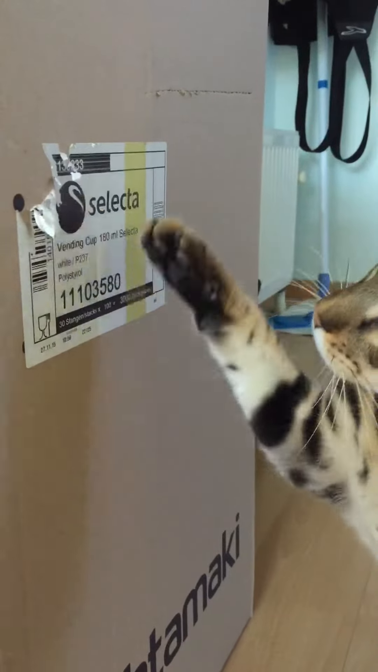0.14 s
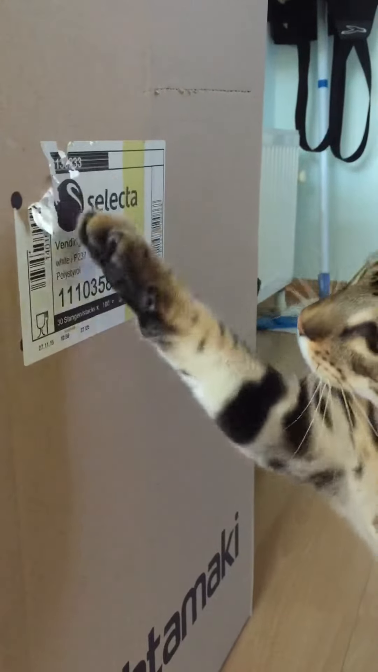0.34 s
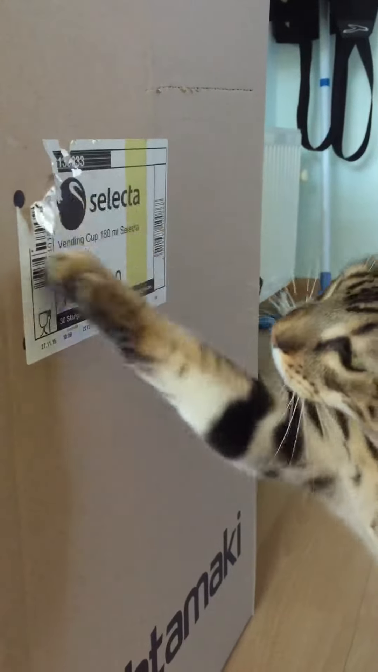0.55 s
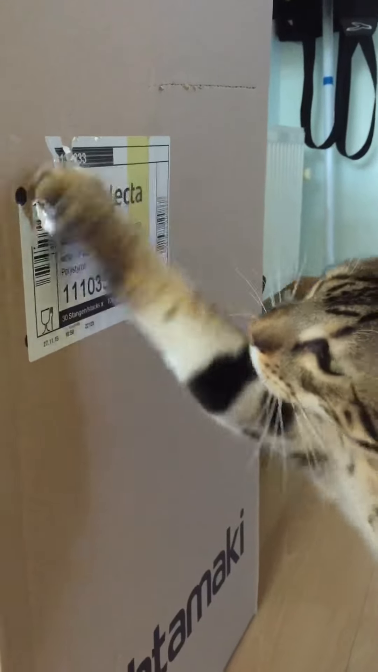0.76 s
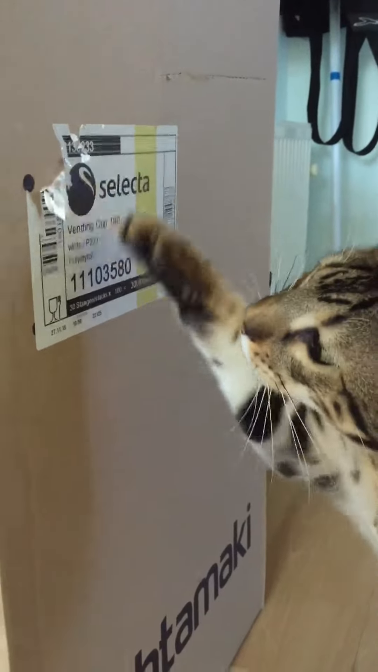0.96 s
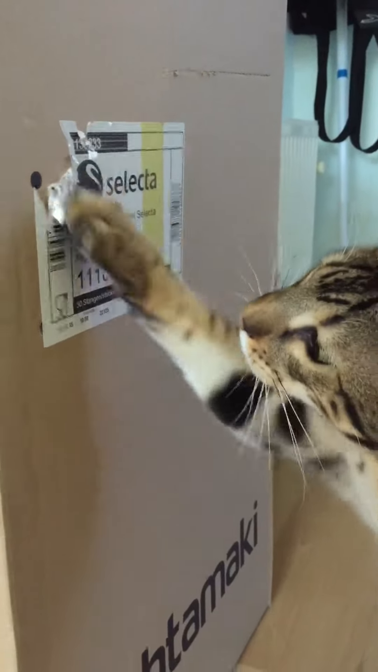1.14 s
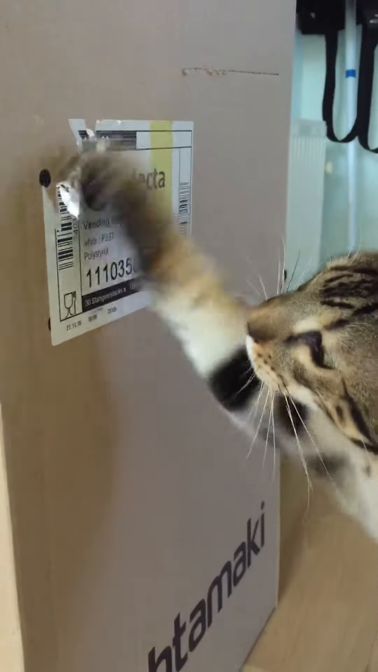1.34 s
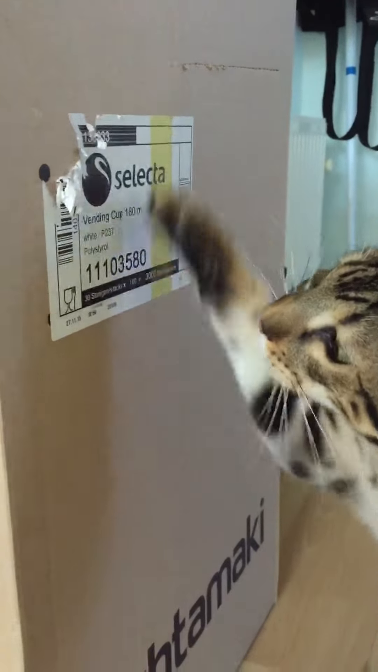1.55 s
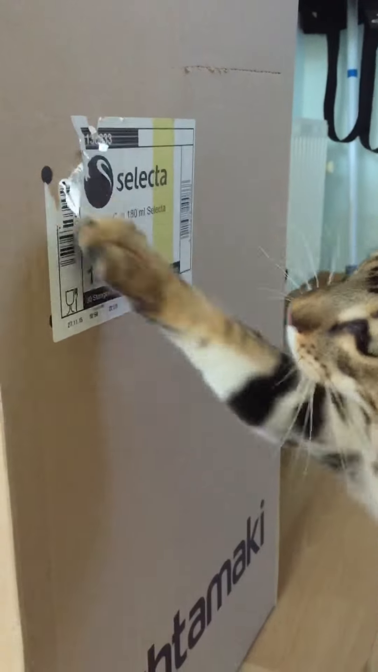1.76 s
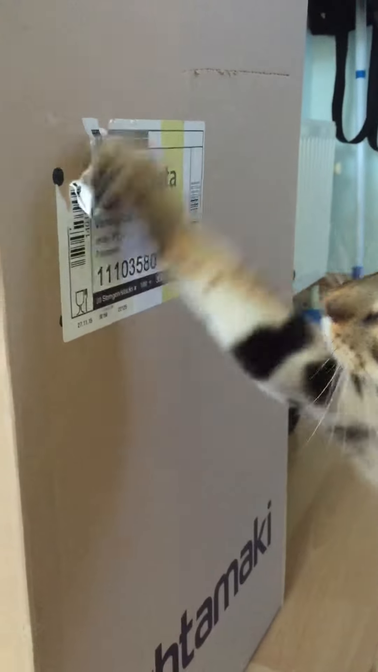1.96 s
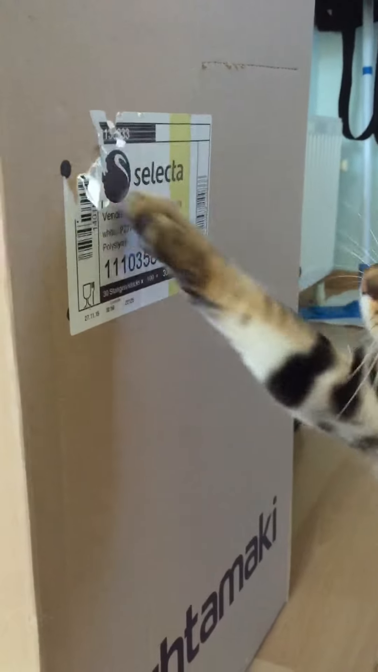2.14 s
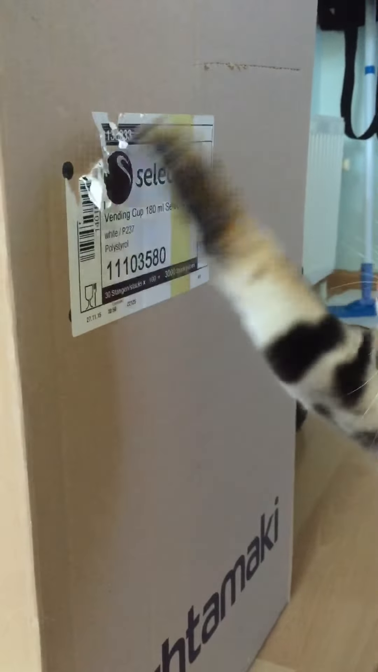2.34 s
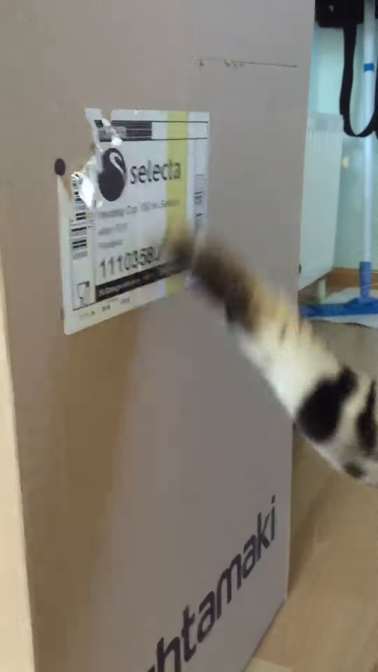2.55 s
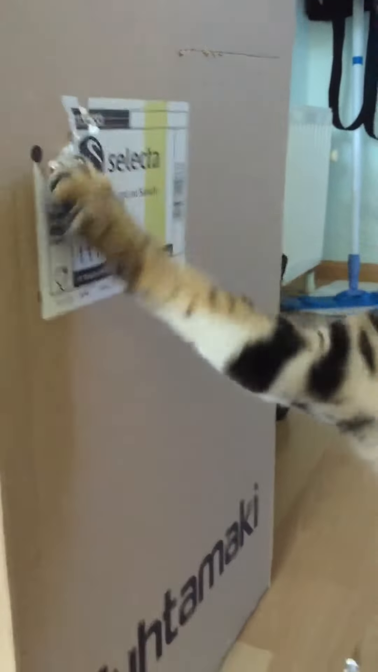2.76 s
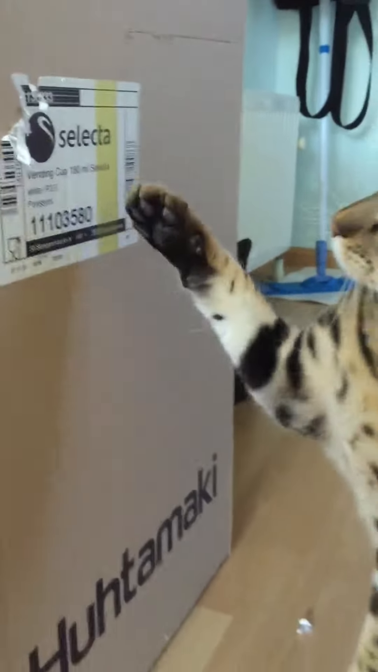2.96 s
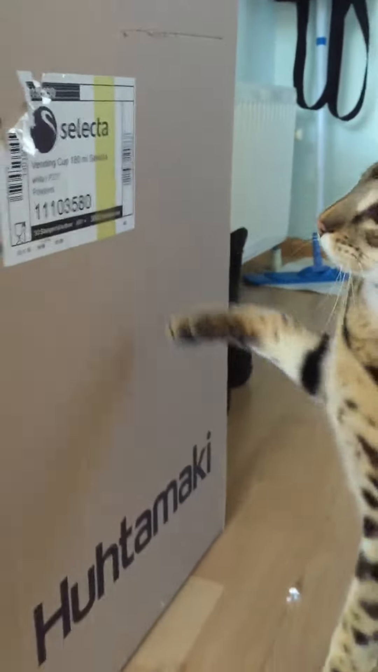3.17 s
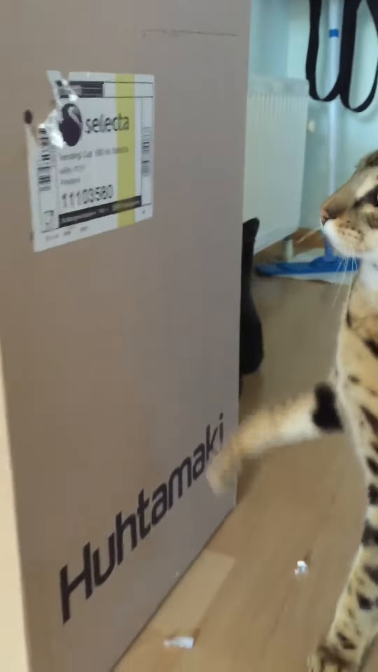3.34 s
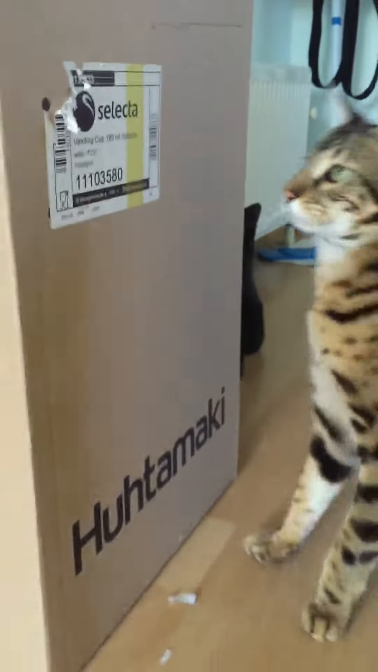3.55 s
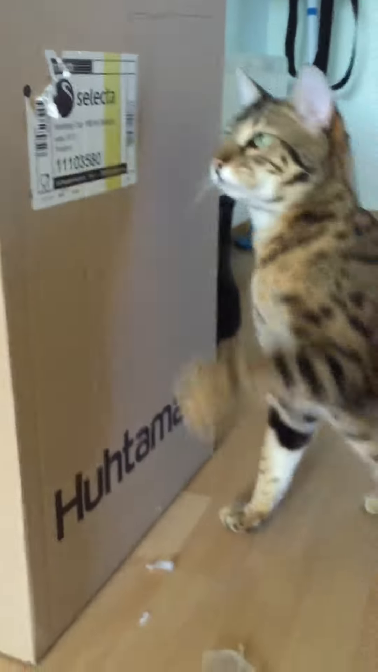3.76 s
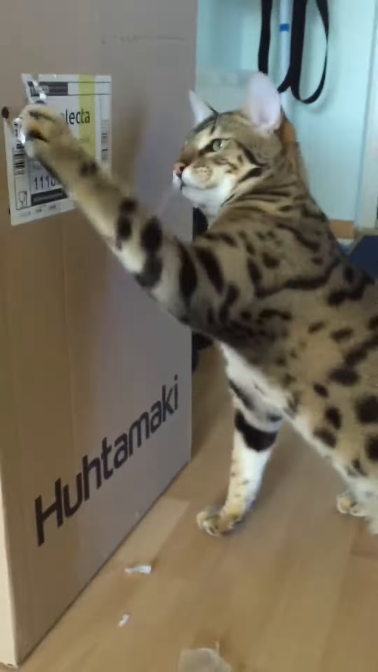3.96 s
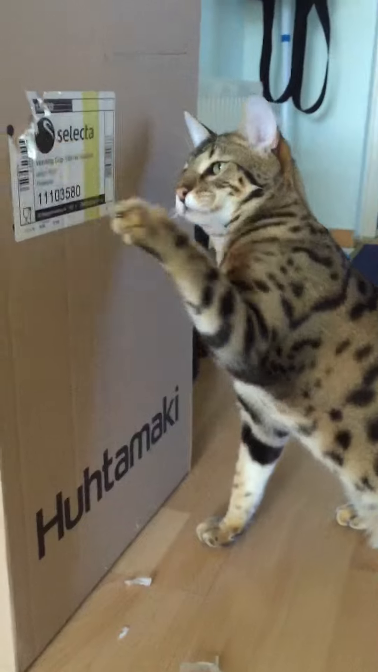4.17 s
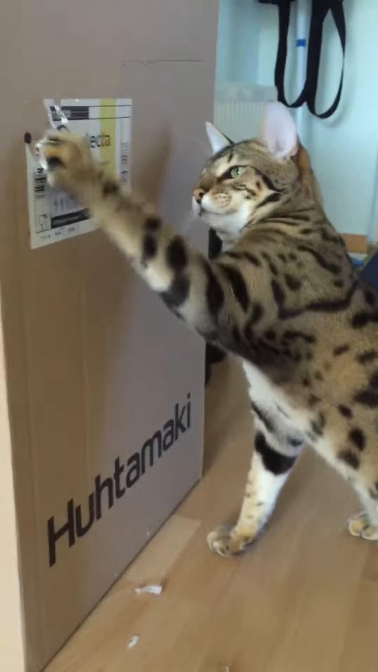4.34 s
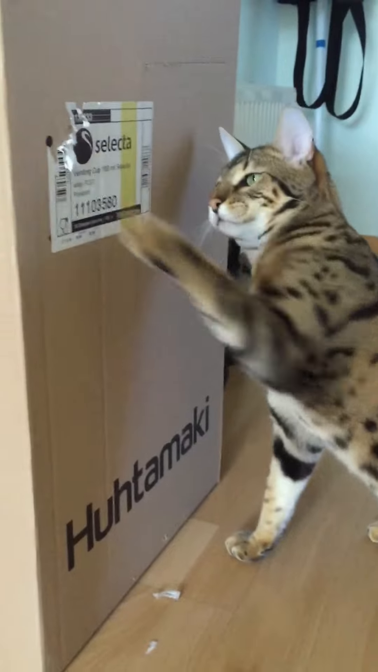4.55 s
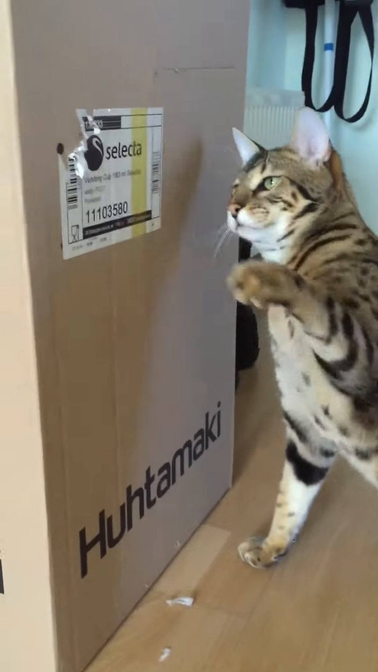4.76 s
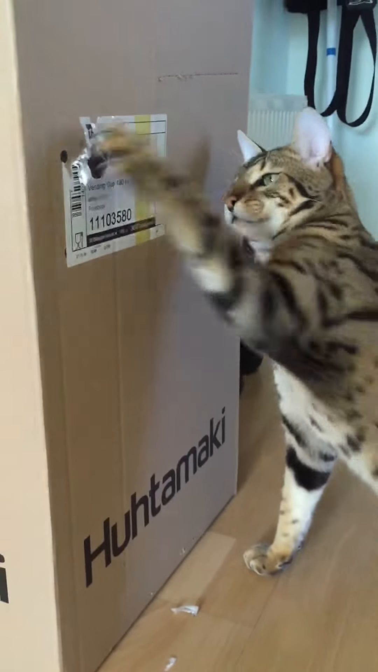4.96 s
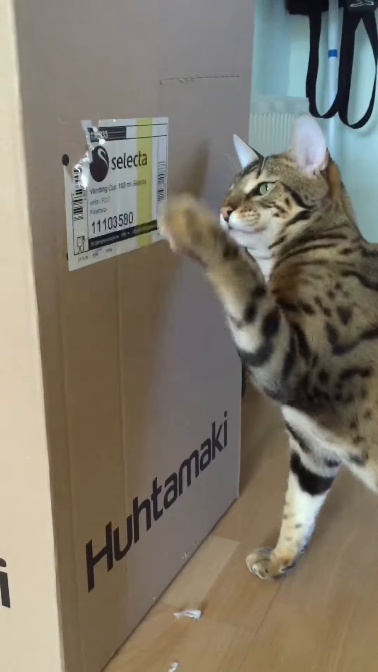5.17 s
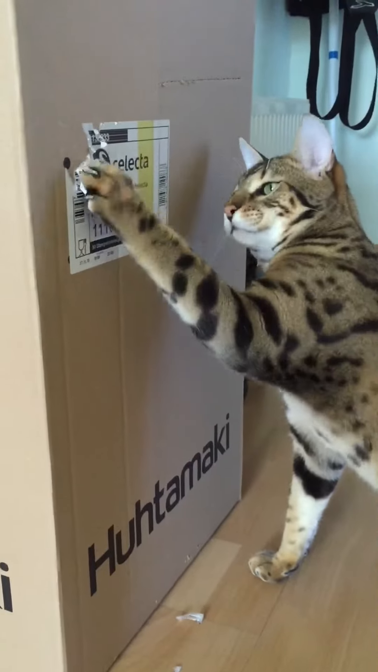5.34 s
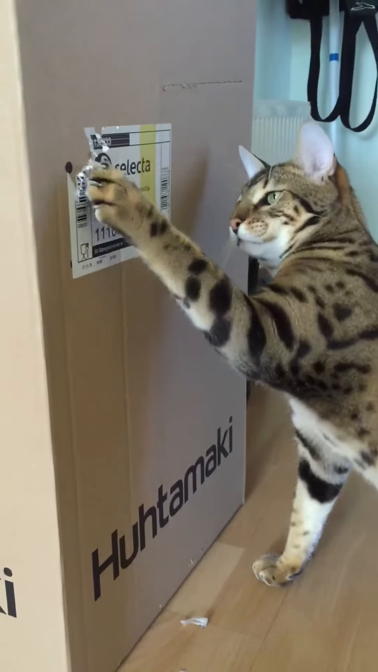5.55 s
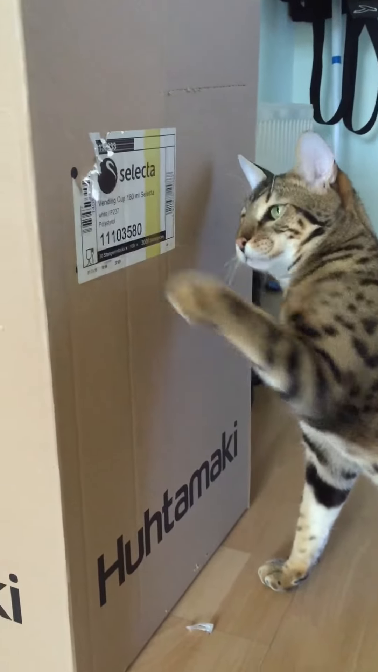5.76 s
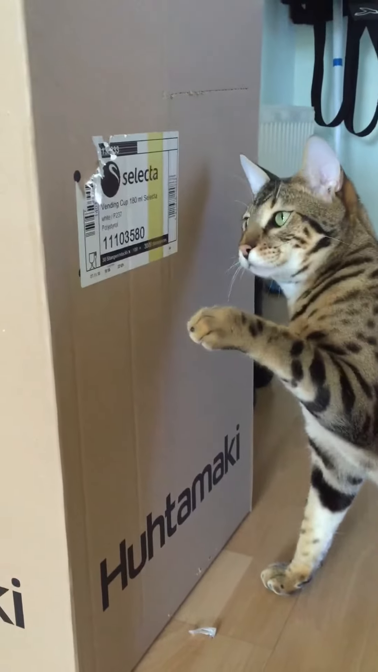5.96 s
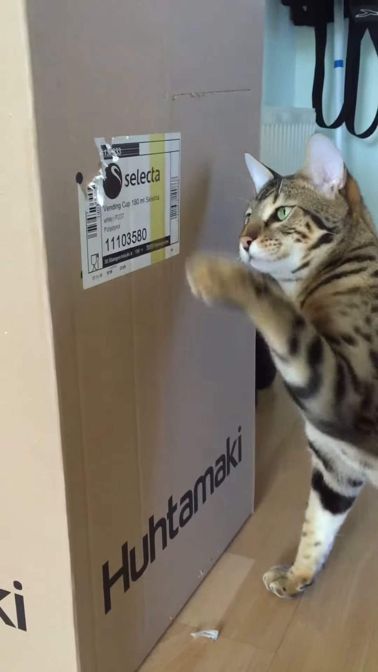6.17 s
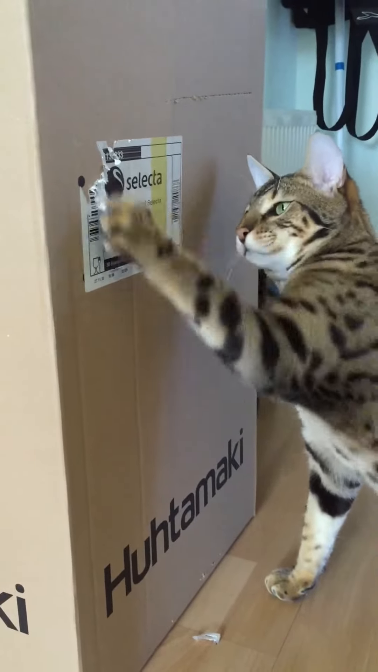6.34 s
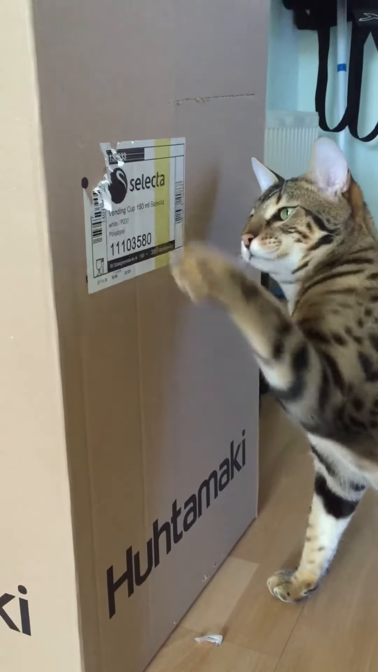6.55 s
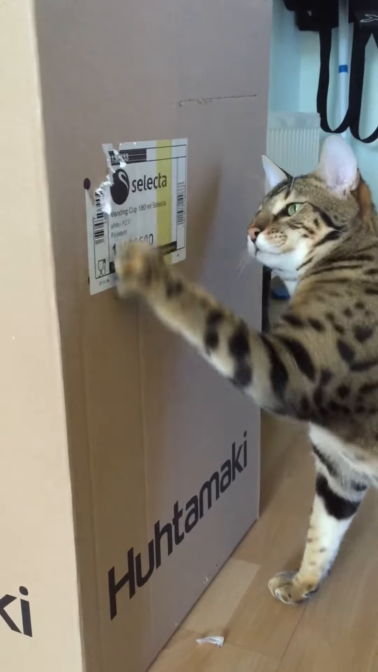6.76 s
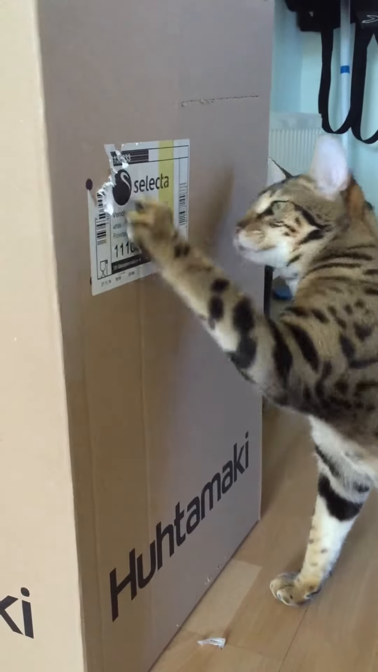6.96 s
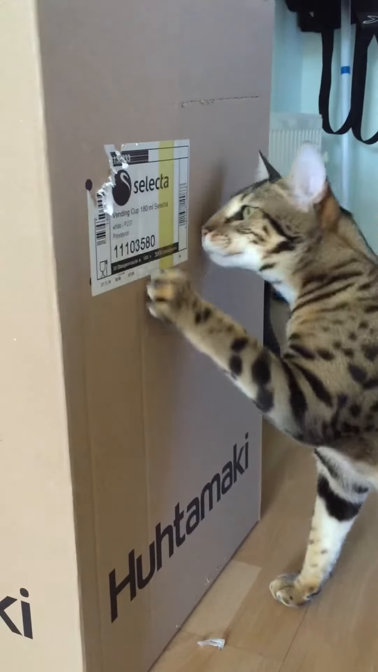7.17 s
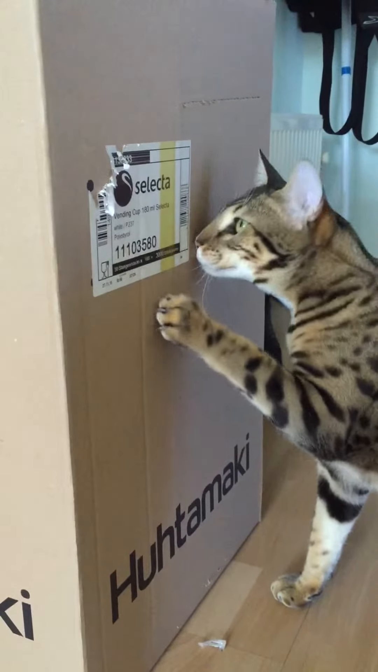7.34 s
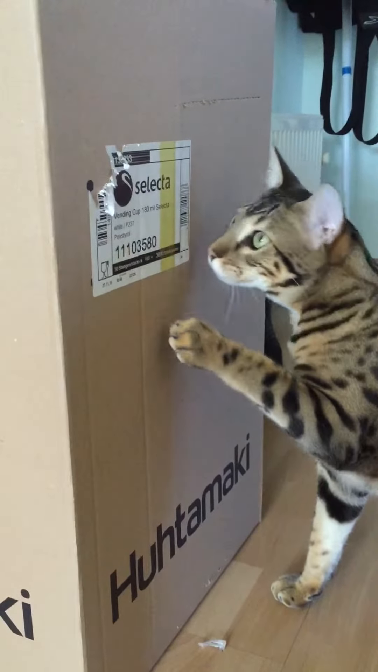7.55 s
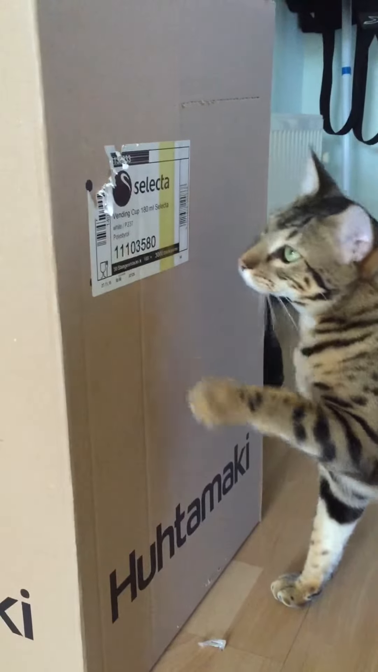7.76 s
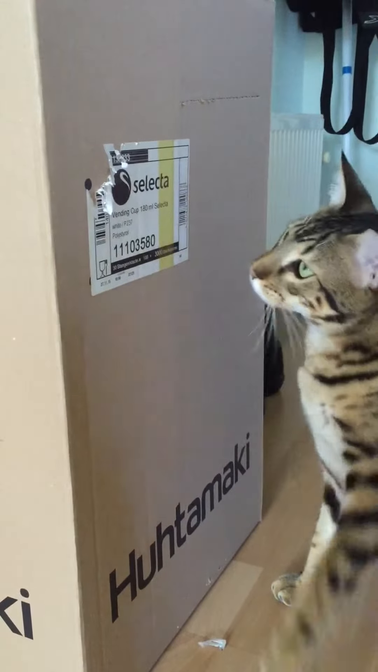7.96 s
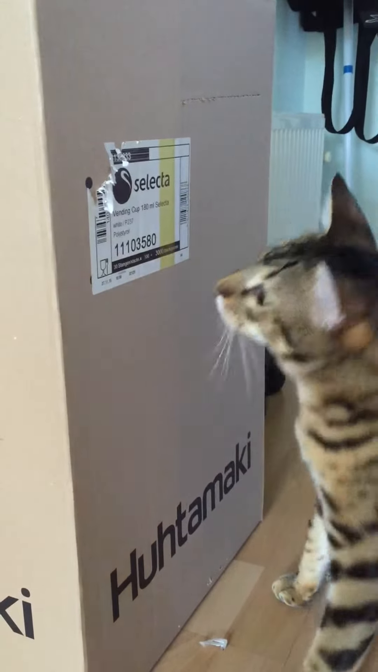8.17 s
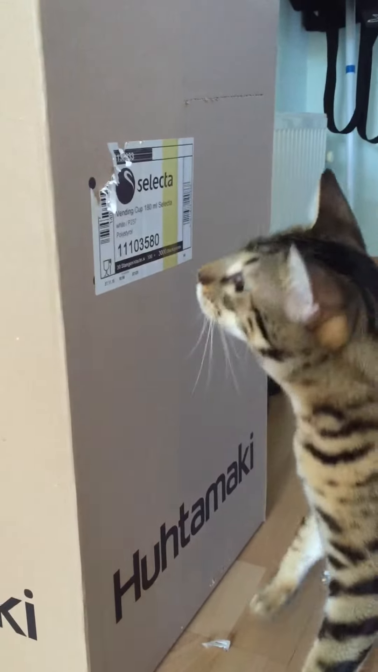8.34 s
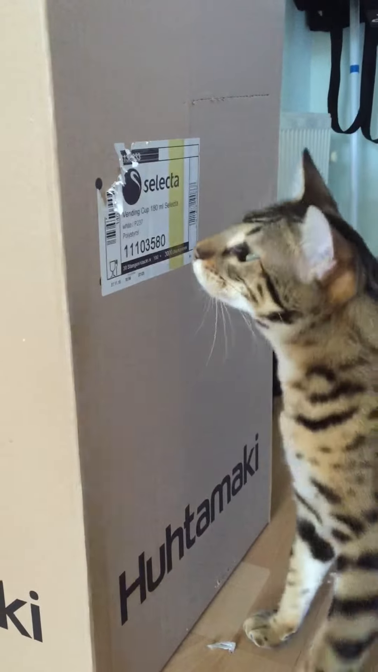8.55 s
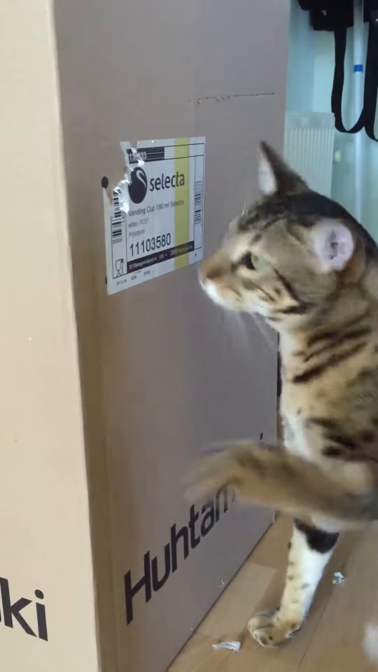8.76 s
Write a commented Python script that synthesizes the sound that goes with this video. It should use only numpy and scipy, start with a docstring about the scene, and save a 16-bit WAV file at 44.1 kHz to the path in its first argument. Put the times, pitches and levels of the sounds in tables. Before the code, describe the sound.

A cat's paw thumps a large hollow cardboard box again and again, claws scraping and snagging its paper label in a small quiet room.

```python
"""A paw thumps a big cardboard box, then claws scrape: a cat swipes at its paper label in a small quiet room.
Each blow is a falling chirp plus ringing wall tones. The scrapes, and two brief rustles as the cat moves, are
random tiny slips filtered into board rasp and paper rustle, over drumming. Noise bursts make snaps and ticks,
mostly claws snagging on the label. Soft floor thuds are fading sine tones; rumble and hiss are filtered noise.
An echo and a fading noise tail make the room; a phone about a metre away picks it all up."""
import sys
import numpy as np
from scipy import signal
from scipy.fft import rfft, irfft
from scipy.io import wavfile
from scipy.ndimage import uniform_filter1d

SR = 44100
rng = np.random.default_rng(int(sys.argv[2]) if len(sys.argv) > 2 else 0)


def transcribe(signal):
    """Save signal, clipped to [-1, 1], as a 16-bit WAV file at the path in sys.argv[1]."""
    frames = np.atleast_2d(signal).T
    limited = np.clip(frames, -1, 1)
    pcm = np.round(limited * 32767).astype(np.int16)
    wavfile.write(sys.argv[1], SR, pcm)


N = 388521  # length of the scene in samples

# The tones (modes) of the box wall, before each blow shifts them a little and long rings are cut short.
# Each row: pitch in Hz, strength in dB, time to fade by 60 dB in seconds.
WALL_MODES = [(107, -19.5, 0.19), (158, -9.5, 0.45), (201.3, -0.5, 0.1013), (283.8, 7, 0.069),
              (452, -7, .11), (606, -1, 0.037), (717.4, -1, 0.055), (889, -9.5, 0.026), (1028, -10, 0.076),
              (1163, -11, 0.04), (1254, -21, .09), (1599, -13.5, 0.062), (1720, -9, 0.041),
              (2040, -21, .08), (2507, -17.5, 0.041), (2800, -15.5, 0.051), (3000, -16.5, 0.034)]
# Tone colour of the cardboard. Each row: frequency in Hz, relative level in dB.
BOARD_COLOUR = [(350, -26), (650, 2.5), (950, 4.5), (1450, 0), (2100, -0.5), (2800, -5.5), (3800, -7),
                (5500, -19), (12000, -56)]
# Tone colour of the paper label. Each row: frequency in Hz, relative level in dB.
PAPER_COLOUR = [(1200, -23), (2200, -1), (3500, -1), (4800, -7), (6000, -2), (7500, -6.5), (9500, -4),
                (11000, -7.5), (13000, -8.5), (15500, -12), (18000, -5)]


def undb(db):
    """Turn dB into gain."""
    return 10 ** (np.asarray(db) / 20)


def unit(x):
    """Scale to an average (rms) level of 1."""
    return x / np.sqrt(np.mean(x ** 2))


def add(out, start_s, x):
    """Mix x into out from the given time."""
    i = int(start_s * SR)
    out[i:i + len(x)] += x[:N - i]


def fade(t60, length_s):
    """Exponential decay that drops 60 dB in t60 seconds."""
    t = np.arange(int(length_s * SR)) / SR
    return np.exp(-np.log(1000) * t / max(t60, .001))


def colour(x, shape, size=4096):
    """Filter x to the (Hz, dB) shape without sound ahead of its cause, from the cepstrum of the log gain."""
    hz, db = np.transpose(shape)
    grid = np.maximum(np.arange(size // 2 + 1) * SR / size, 1)
    log_gain = np.interp(np.log(grid), np.log(hz), db) * np.log(10) / 20
    cepstrum = irfft(log_gain)
    # folding the second half onto the first makes the filter respond as early as it can
    cepstrum[1:size // 2] *= 2
    cepstrum[size // 2 + 1:] = 0
    response = irfft(np.exp(rfft(cepstrum)))
    return signal.fftconvolve(x, response)[:len(x)]


def blows(ring_db=5.5):
    """A slap, then the wall rings; each landing excites the modes a little differently."""
    # Paw landings. Each row: start in seconds, slap level in dB, boost of the low drum tones
    # against the upper ones in dB, contact time of the pad in ms.
    landings = [(0.007, -26, -7, 0.16), (0.58, -37.5, -11, 1), (0.856, -36.5, -7, 0.52),
                (1.211, -34.5, 0, 0.23), (1.442, -41, -21, 1), (1.751, -32, -7, 0.23),
                (2.091, -23.5, -8, 0.52), (2.496, -27, -7.5, 0.45), (2.789, -33.5, -5, 0.27),
                (2.95, -33, 4.5, 0.3), (4.087, -29, -18, 0.36), (4.162, -24.5, 3, 0.49),
                (4.469, -21, 13.5, 0.32), (5.127, -20.5, -10, 0.88), (5.413, -23, -12, 1),
                (5.728, -40.5, -2, 0.45), (6.447, -29, -39, 1), (6.776, -19, -0.5, 0.38),
                (7.099, -22.5, -7.5, 1)]
    out = np.zeros(N)
    spots = rng.standard_normal((len(landings), len(WALL_MODES)))
    for (start_s, db, drum_db, contact_ms), spot in zip(landings, spots):
        ring = wall_ring(drum_db, contact_ms, spot)
        add(out, start_s, undb(db + ring_db) * ring / np.abs(ring).max())
        add(out, start_s, undb(db) * slap())
    return out


def slap(from_hz=2200, to_hz=480, fall_s=0.00108, t60=0.028):
    """First arrival of the blow: a wave packet that falls in pitch, highs ahead of lows."""
    t = np.arange(int(.03 * SR)) / SR
    hz = to_hz + (from_hz - to_hz) * np.exp(-t / fall_s)
    return np.sin(2 * np.pi * np.cumsum(hz) / SR) * fade(t60, .03)


def wall_ring(drum_db, contact_ms, spot, crawl=0.054):
    """One push on the wall; bending waves carry the lows more slowly, so they speak later."""
    drum_hz, longest_ring_s, detune = 360, .16, .008  # detune is a share of the pitch
    t = np.arange(int(.4 * SR)) / SR
    out = 0
    for (hz, db, t60), luck in zip(WALL_MODES, spot):
        delay_s = crawl / np.sqrt(hz) - crawl / np.sqrt(WALL_MODES[-1][0])
        late = np.maximum(t - delay_s, 0)
        soft = 1 / (1 + (hz * contact_ms / 1000) ** 2)  # a longer contact weakens the highs
        gain = undb(db + 5.3 * luck + drum_db * (hz < drum_hz)) * soft
        tone = np.sin(2 * np.pi * hz * (1 + detune * luck) * late)
        out = out + gain * tone * np.exp(-np.log(1000) * late / min(t60, longest_ring_s))
    return out


def scrapes_and_rustles(modes_db=-7.0, rasp_hz=2300, sharp=0.43, plain_db=-9.5, wander_db=1.5):
    """Claw scrapes on board and paper, drummed by the dragging pad; last, brief rustles as the cat moves."""
    # Each row: start in seconds, time to swell to the dig peak in seconds, dig peak in dB,
    # starting slide level in dB, contact time in seconds, starting paper level against the board in dB,
    # drumming against the slide in dB. The last two rows are brief rustles as the cat moves.
    rubs = [(0.01, 0.025, -26, -40.5, 0.13, -12, 0.5), (0.582, 0.01, -42.5, -50.5, 0.095, -9, 4.5),
            (0.856, 0.034, -34.5, -39, 0.13, -11, -0.5), (1.212, 0.0055, -42.5, -44.5, 0.12, -8.5, 3),
            (1.441, 0.063, -30, -41.5, .17, -9, -6.5), (1.755, 0.031, -24, -35.5, 0.12, -8, 3.5),
            (2.09, 0.027, -26, -41, 0.17, -10, 6.5), (2.496, 0.021, -36.5, -44, 0.12, -5.5, 4),
            (2.79, 0.039, -33, -40, 0.14, -11.5, 6), (2.948, 0.017, -57, -51, 0.046, -6, 11),
            (4.09, 0.0035, -31.5, -33, 0.079, -14, 3), (4.165, 0.017, -42, -47.5, 0.089, -6, 6.5),
            (4.47, 0.0027, -23, -33.5, 0.14, -18, 1.5), (5.127, 0.018, -26, -37.5, 0.12, -18, 1),
            (5.411, 0.0074, -27.5, -35, 0.07, -13.5, 0.5), (5.521, 0.024, -51, -54.5, 0.065, -14, 2.5),
            (5.7, 0.037, -55, -60.5, 0.074, -1.5, 8.5), (6.447, .026, -35, -39, 0.128, -18, 7),
            (6.777, 0.0071, -26.5, -32, 0.097, -14, 1), (6.871, 0.042, -37, -40.5, 0.089, -14.5, 3),
            (7.102, 0.017, -36, -35, 0.093, -12.5, -3.5), (8.25, 0.0085, -58, -67, 0.03, 5.5, 4),
            (8.74, 0.016, -66, -71, 0.043, 0, 3)]
    # Path of the one long slow drag. Each row: time in seconds, claws on board in dB,
    # paper against the claws in dB.
    slow_drag = [(7.18, -54, -17), (7.222, -40.5, -13), (7.236, -38, -14.5), (7.345, -37.5, -15.5),
                 (7.406, -49, -15.5), (7.53, -52.5, -19), (7.575, -65.5, -30), (7.6, -85, -28)]
    dig_rise, dig_fall = 455.5, 419.5  # dB per second; in a scrape the claws bite in, then tear free
    # dB per second, and s; in a scrape the pad slows, then leaves the wall
    slide_sag, lift, touch_s = 142, 593, .0013
    # dB per second: the rustle holds up while the slide sags, and stops short at the end of contact
    paper_gain, paper_lift = 58.5, 601

    centre = np.zeros(len(WALL_MODES))
    claws = slips(1200, 3.04, 0.028)
    # the claws are hard points and reach the upper wall modes; the pad is soft and reaches the low ones
    claw_ring = unit(signal.fftconvolve(claws, wall_ring(-29.5, 0.24, centre))[:N])
    board = unit(unit(colour(claws, BOARD_COLOUR)) + undb(modes_db) * claw_ring)
    dull = signal.sosfiltfilt(signal.butter(2, rasp_hz, fs=SR, output="sos"), board)
    rasp = board - dull
    steps = np.repeat(rng.standard_normal(N // 512 + 1), 512)
    wander = wander_db * unit(uniform_filter1d(steps, size=512))
    paper = unit(colour(slips(1700, 2.1, 0.0096), PAPER_COLOUR))
    drum = unit(signal.fftconvolve(slips(900, 1.2, 0.01), wall_ring(-3, 0.89, centre))[:N])

    def rub_sound(i, paper_db):
        """More paper sharpens the rasp, less paper dulls it, and its level keeps wandering."""
        rasp_db = np.clip(sharp * (paper_db - plain_db), -12, 6) + wander[i]
        return dull[i] + undb(rasp_db) * rasp[i] + undb(paper_db) * paper[i]

    out = np.zeros(N)
    for start_s, swell_s, dig_db, slide_db, contact_s, paper_db, drum_db in rubs:
        i = np.arange(int(start_s * SR), min(int(start_s * SR) + SR // 2, N))
        t = i / SR - start_s
        lifted_s = np.maximum(t - contact_s, 0)
        touch = np.minimum(t / touch_s, 1) * undb(-lift * lifted_s)
        before_peak, after_peak = np.maximum(swell_s - t, 0), np.maximum(t - swell_s, 0)
        dig = undb(dig_db - dig_rise * before_peak - dig_fall * after_peak)
        slide = undb(slide_db - slide_sag * t)
        rustle_db = paper_db + paper_gain * np.minimum(t, contact_s) - paper_lift * lifted_s
        rubbing = np.hypot(dig, slide) * rub_sound(i, rustle_db)
        out[i] += touch * (rubbing + slide * undb(drum_db) * drum[i])

    s, drag_db, paper_db = np.transpose(slow_drag)
    i = np.arange(int(s[0] * SR), int(s[-1] * SR))
    # the slow drag has extra rasp in this band, in Hz
    band = signal.butter(2, (1020, 2360), "band", fs=SR, output="sos")
    coarse = unit(signal.sosfiltfilt(band, board))[i]
    drag = rub_sound(i, np.interp(i / SR, s, paper_db)) + undb(-11) * coarse + undb(-18) * drum[i]
    out[i] += undb(np.interp(i / SR, s, drag_db)) * drag
    return out


def slips(rate, spread_db, smear_s):
    """Random tiny slips (rate per second) of uneven size, each a short burst of the sheet's dense modes."""
    chance = rng.random((2, N))
    rarity = np.minimum(-np.log(1 - chance[1]), 4)  # mostly small slips, a few big ones
    power = (chance[0] < rate / SR) * undb(2 * spread_db * rarity)
    smeared = signal.fftconvolve(power, fade(smear_s, .05) ** 2)[:N]
    return np.sqrt(np.abs(smeared)) * rng.standard_normal(N)


def snaps_and_ticks(snap_s=.022, knock_s=.035):
    """Bright snaps and ticks, each a burst of paper-coloured noise with a short board-coloured knock."""
    # Each row: start in seconds, snap level in dB, knock against the snap in dB.
    # Mostly claw snags on the label; 3.679 and 3.735 s are faint claw ticks on the floor,
    # and the last three rows are short rustling ticks as the cat moves.
    ticks = [(0.1132, -38, 0.5), (0.6038, -39, -15), (0.8767, -31, 4.5), (0.9576, -38, 2.5),
             (1.2263, -38.5, 7), (1.287, -46, -12), (1.311, -59, -10), (1.37, -56, -17),
             (1.495, -35.5, -12), (2.2217, -32, -1.5), (2.821, -19.5, -1), (2.8604, -25, 5),
             (2.972, -33.5, 1), (3.205, -55.5, 12.5), (3.679, -53.5, -13), (3.735, -53, -15),
             (4.1025, -35, 14), (4.1608, -21, -5), (4.1796, -46, 9.5), (4.4784, -29, 5), (4.556, -35, -12),
             (5.1334, -29.5, -1), (5.534, -36, -7), (5.7031, -38, -22), (5.7573, -46, -16),
             (6.4554, -37, -18), (6.4754, -33, -16), (7.098, -27.5, 10.5), (7.228, -44, 12),
             (8.2545, -37.5, -14.5), (8.7432, -42.5, -9), (8.758, -32.5, -18)]
    out = np.zeros(N)
    noises = rng.standard_normal((len(ticks), 2, int(.05 * SR)))
    for (start_s, db, knock_db), noise in zip(ticks, noises):
        snap = colour(noise[0] * fade(snap_s, .05), PAPER_COLOUR)
        knock = colour(noise[1] * fade(knock_s, .05), BOARD_COLOUR)
        both = snap / np.abs(snap).max() + undb(knock_db) * knock / np.abs(knock).max()
        add(out, start_s, undb(db) * both)
    return out


def thuds(rise_s=0.0021):
    """A single damped floor resonance for each; the soft push makes it swell before it fades."""
    # Each row: start in seconds, level in dB, pitch in Hz, time to fade by 60 dB in seconds.
    floor_hits = [(3.205, -41.5, 278, 0.012), (3.611, -39.5, 340, 0.024), (3.677, -50, 352, 0.05),
                  (3.711, -50.5, 355, 0.06), (3.73, -34.5, 126, 0.019), (3.771, -38, 140.6, 0.0095),
                  (5.738, -35.5, 151, 0.047), (8.251, -44, 315, 0.042), (8.374, -57, 413, 0.03),
                  (8.539, -60, 330, 0.045)]
    out = np.zeros(N)
    t = np.arange(int(.2 * SR)) / SR
    for start_s, db, hz, t60 in floor_hits:
        shape = (1 - np.exp(-t / rise_s)) ** 2 * fade(t60, .2)
        add(out, start_s, undb(db) * shape / shape.max() * np.sin(2 * np.pi * hz * t))
    return out


def room(x, tail_db=-14, echo_ms=9.3, echo_db=-12.5):
    """One strong early echo and a diffuse noise tail, whose octave bands each fade at their own pace."""
    # Each row: frequency in Hz, time for the tail to fade by 60 dB in seconds.
    decay = [(100, 0.42), (400, 0.32), (1500, 0.41), (5000, 0.15), (12000, 0.34)]
    decay_hz, decay_s = np.transpose(decay)
    tail = 0
    for hz in 60 * 2. ** np.arange(8):
        t60 = np.interp(np.log(hz), np.log(decay_hz), decay_s)
        octave = signal.butter(2, [hz, 2 * hz], "band", fs=SR, output="sos")
        tail = tail + signal.sosfilt(octave, rng.standard_normal(int(.6 * SR))) * fade(t60, .6)
    answer = np.zeros(SR)
    add(answer, echo_ms / 1000, undb(tail_db) * tail / np.sqrt(np.sum(tail ** 2)))
    answer[int(echo_ms / 1000 * SR)] += undb(echo_db)
    return x + signal.fftconvolve(x, answer)[:N]


def quiet(level_db=-64.5, waver_db=2.0, rumble_hz=200):
    """Steady hiss over a house rumble that wavers, both cut from one coloured noise."""
    # Tone colour of the background. Each row: frequency in Hz, relative level in dB.
    background = [(18, -62.5), (30, -37), (49, -8), (71, -4.5), (131, -12.5), (161, -21), (404, -24.5),
                  (437, -25), (632, -27.5), (721, -30), (2750, -33.5), (16000, -43.5)]
    k = SR // 8  # samples in one step of the waver
    steps = np.repeat(rng.standard_normal(N // k + 1), k)
    waver = unit(uniform_filter1d(steps, k)[:N])
    air = unit(colour(rng.standard_normal(N), background, size=16384))
    rumble = signal.sosfiltfilt(signal.butter(2, rumble_hz, fs=SR, output="sos"), air)
    hiss = air - rumble
    return undb(level_db) * (hiss + undb(waver_db * waver) * rumble)


def scene():
    """All the cat's sounds share the room; the phone picks up little of their deepest bass."""
    near = room(blows() + scrapes_and_rustles() + snaps_and_ticks() + thuds())
    bass_cut = signal.butter(3, 109.5, "high", fs=SR, output="sos")  # Hz
    thin = signal.sosfilt(bass_cut, near)
    return (thin + quiet())[None]


def record(dry):
    """The phone cuts the top, steeply above 15900 Hz."""
    top_cut = signal.ellip(10, .2, 70, 15900, fs=SR, output="sos")
    return signal.sosfilt(top_cut, dry)


dry = scene()
out = record(dry)
transcribe(out)
```